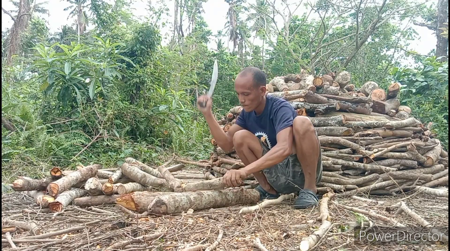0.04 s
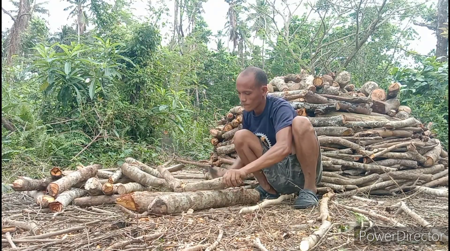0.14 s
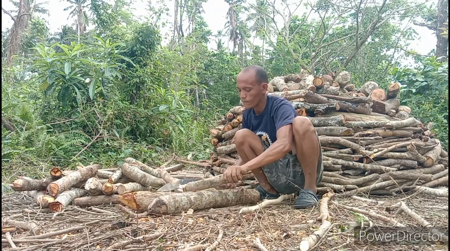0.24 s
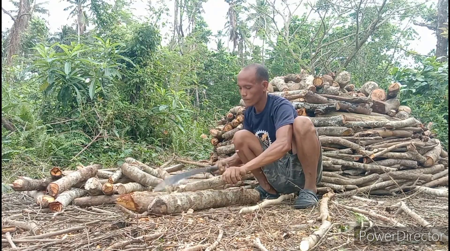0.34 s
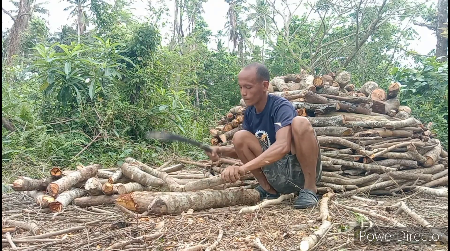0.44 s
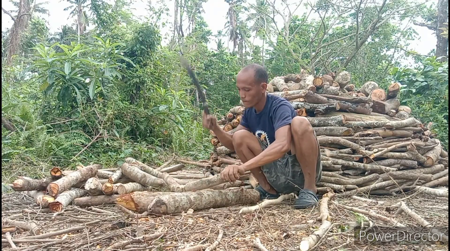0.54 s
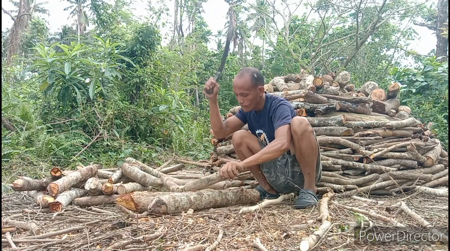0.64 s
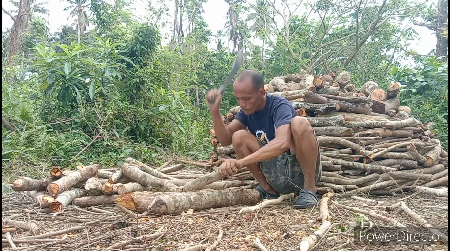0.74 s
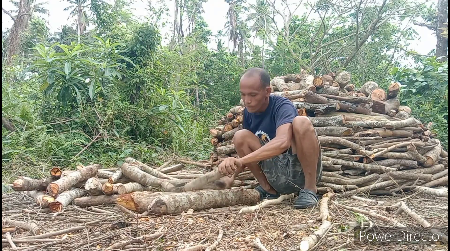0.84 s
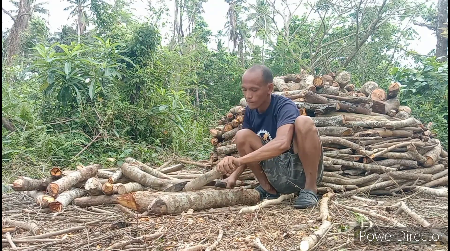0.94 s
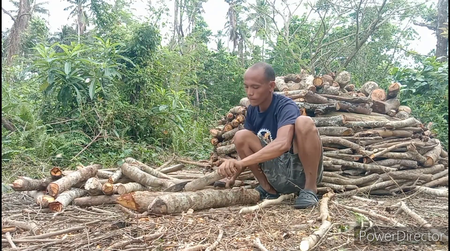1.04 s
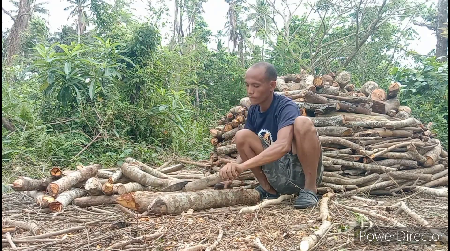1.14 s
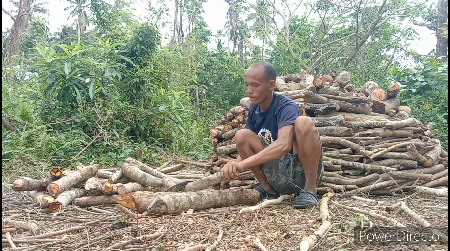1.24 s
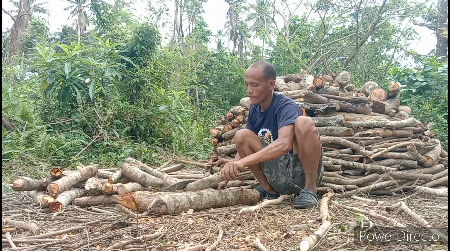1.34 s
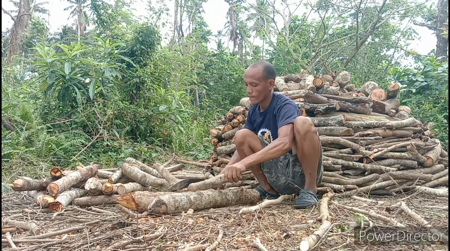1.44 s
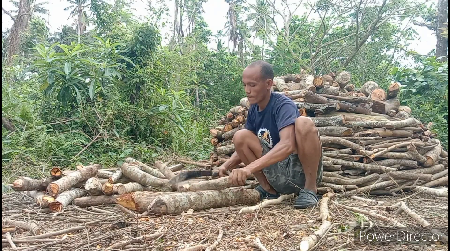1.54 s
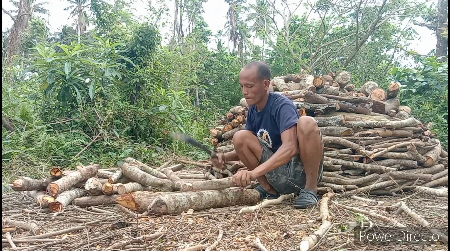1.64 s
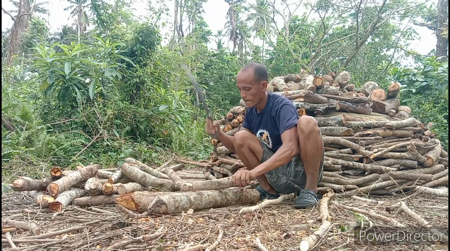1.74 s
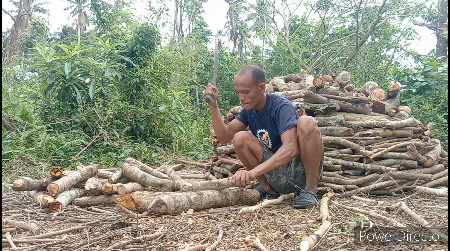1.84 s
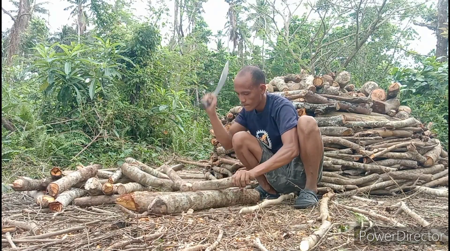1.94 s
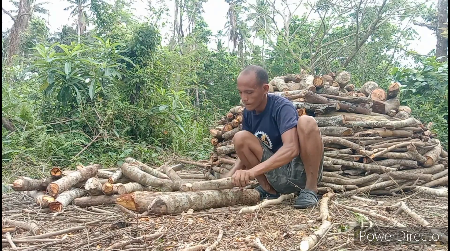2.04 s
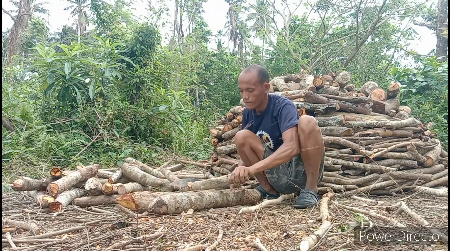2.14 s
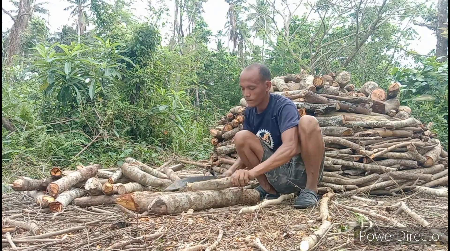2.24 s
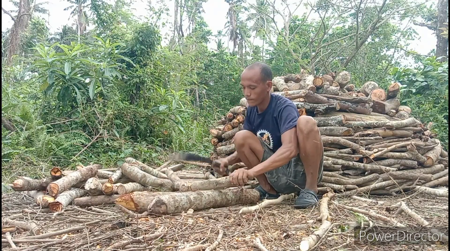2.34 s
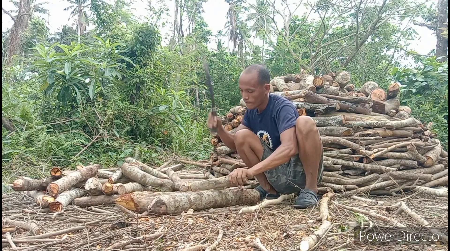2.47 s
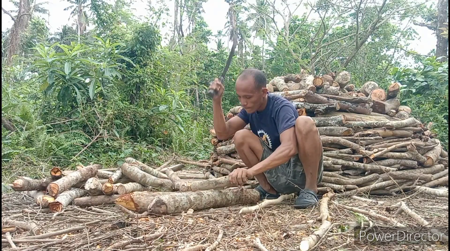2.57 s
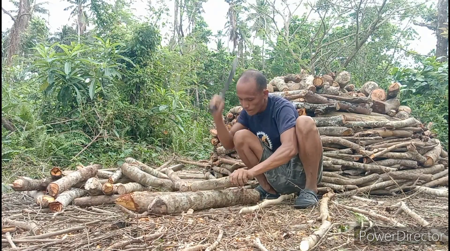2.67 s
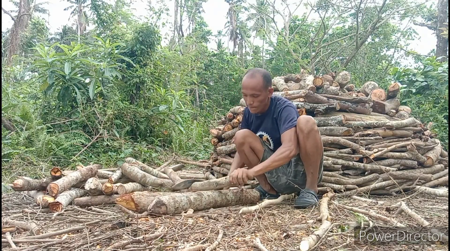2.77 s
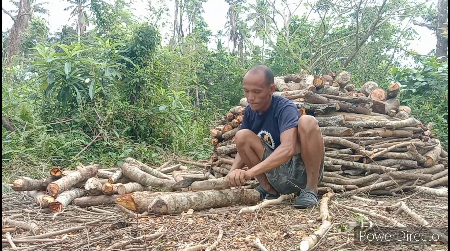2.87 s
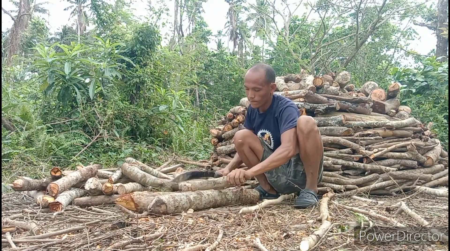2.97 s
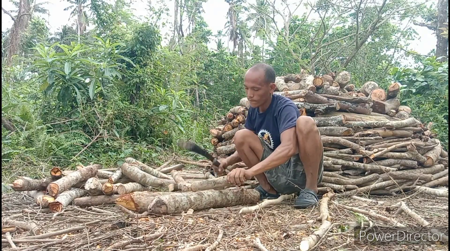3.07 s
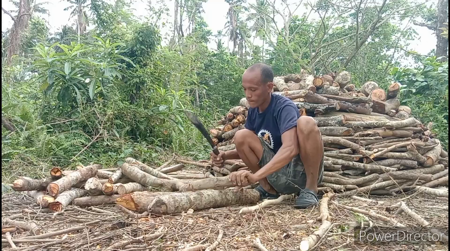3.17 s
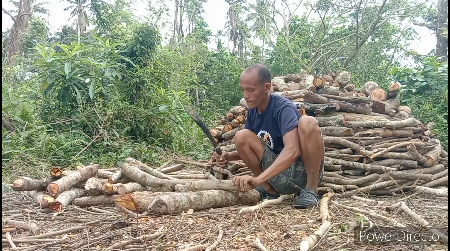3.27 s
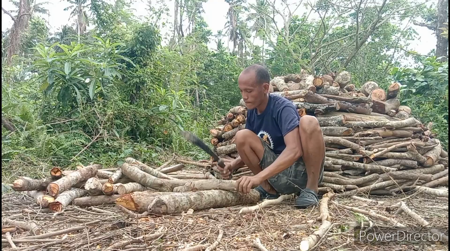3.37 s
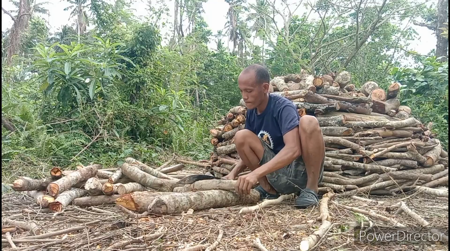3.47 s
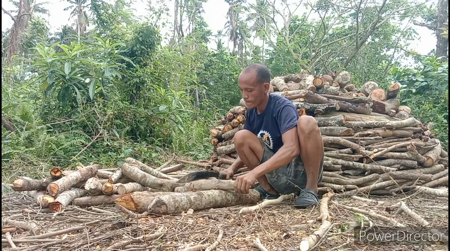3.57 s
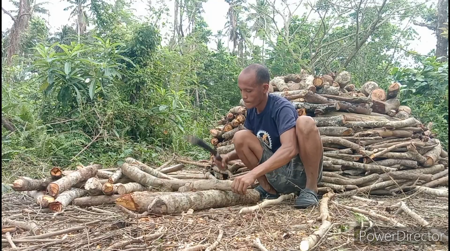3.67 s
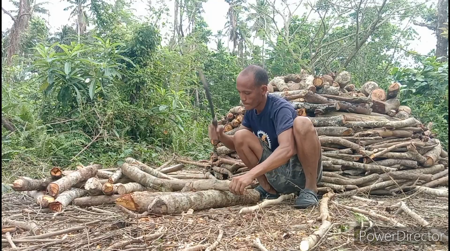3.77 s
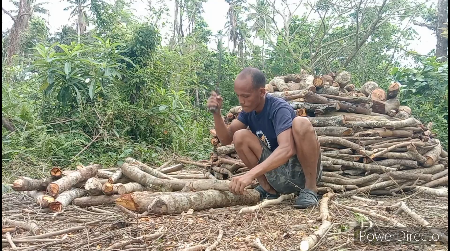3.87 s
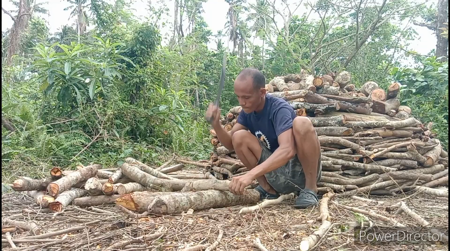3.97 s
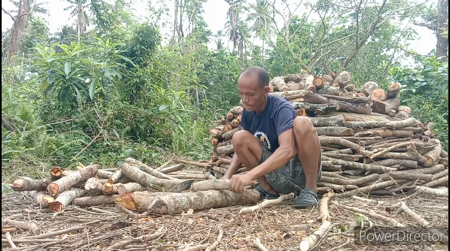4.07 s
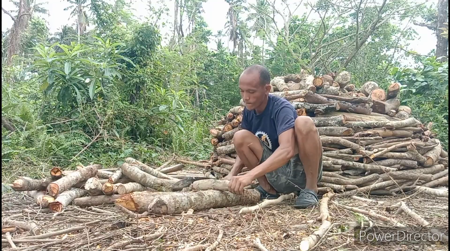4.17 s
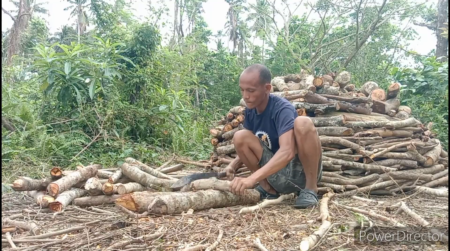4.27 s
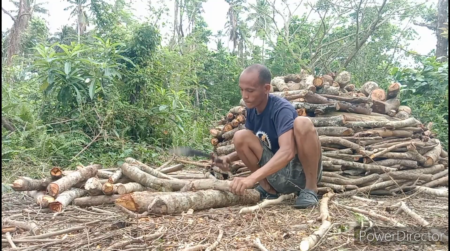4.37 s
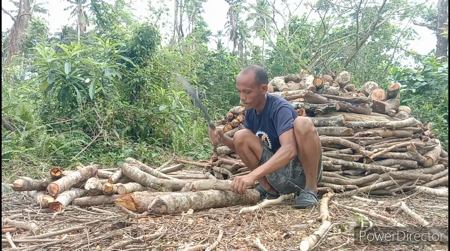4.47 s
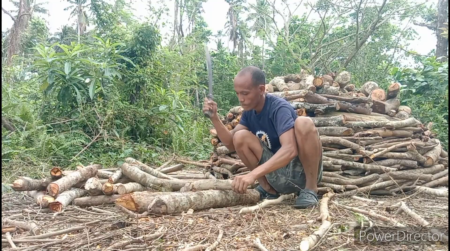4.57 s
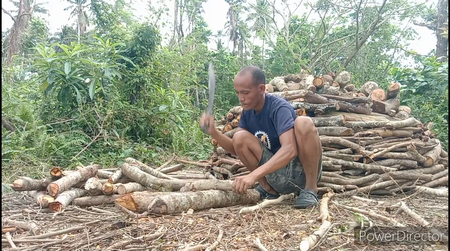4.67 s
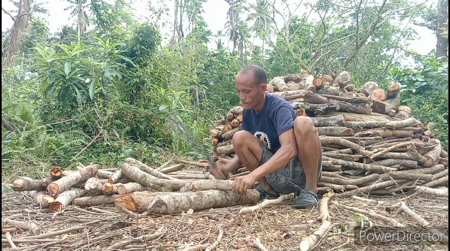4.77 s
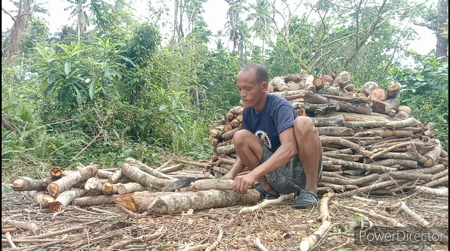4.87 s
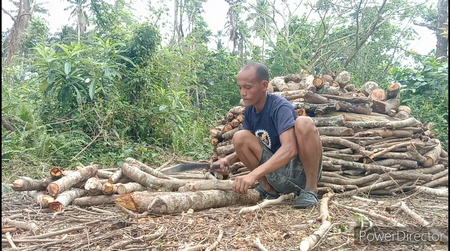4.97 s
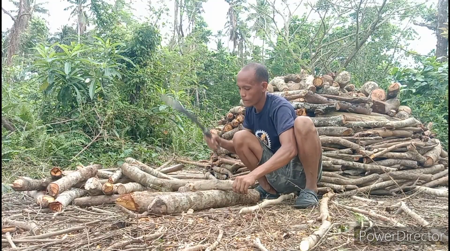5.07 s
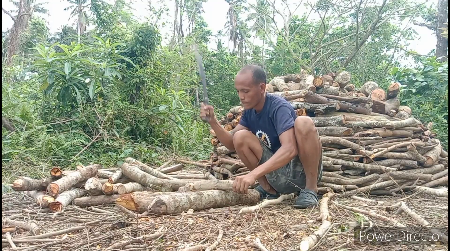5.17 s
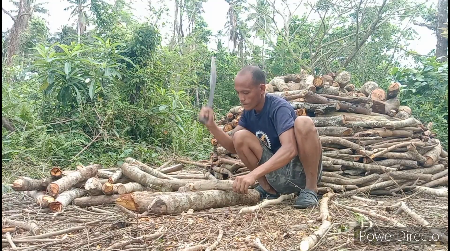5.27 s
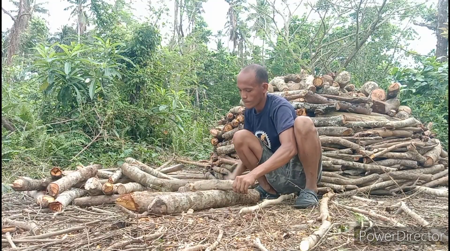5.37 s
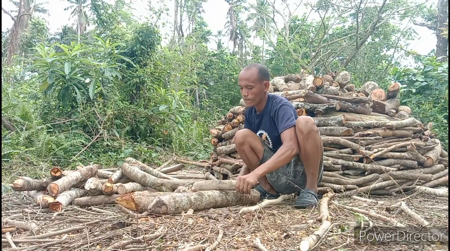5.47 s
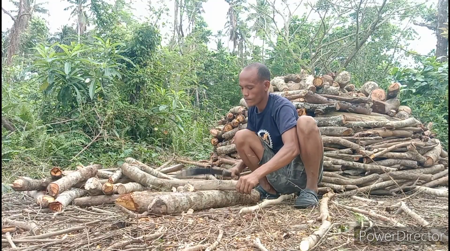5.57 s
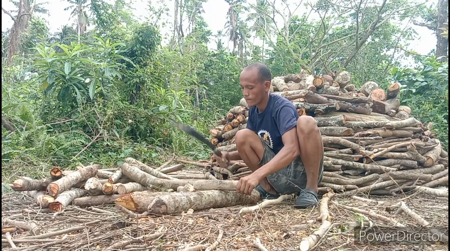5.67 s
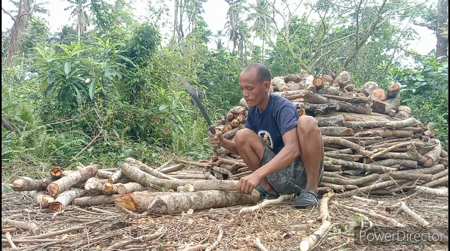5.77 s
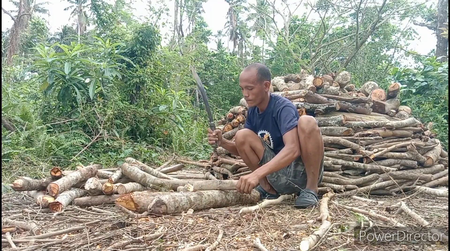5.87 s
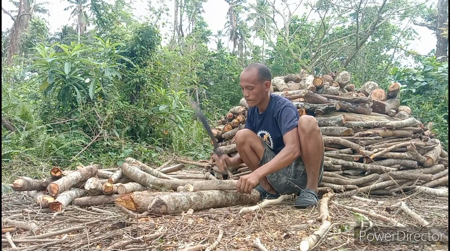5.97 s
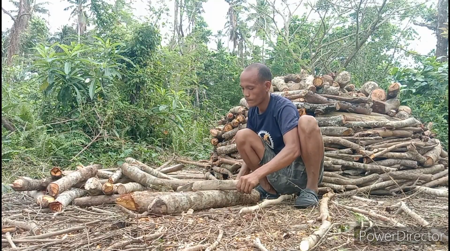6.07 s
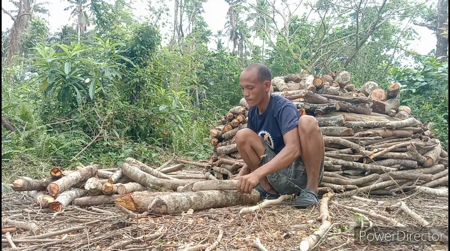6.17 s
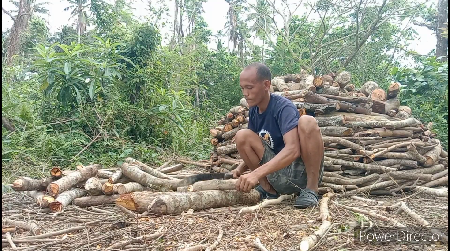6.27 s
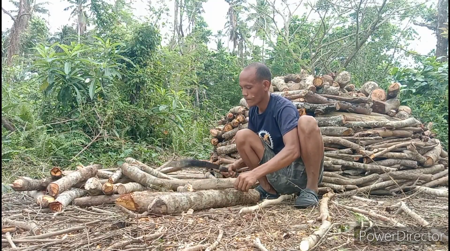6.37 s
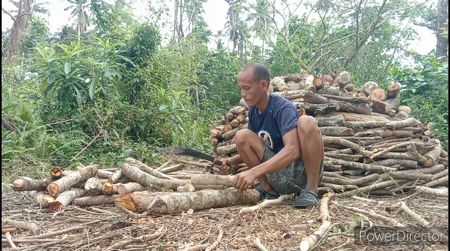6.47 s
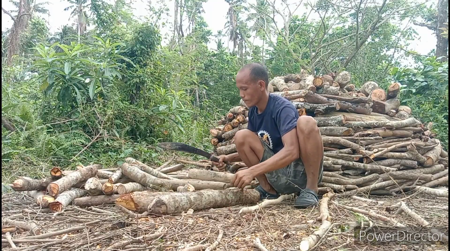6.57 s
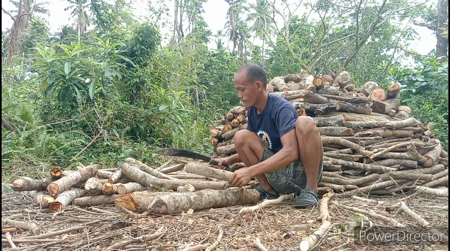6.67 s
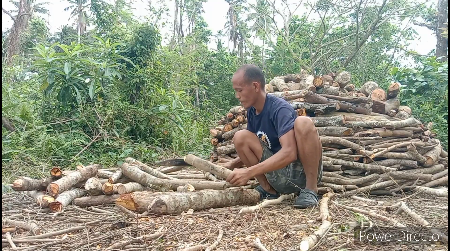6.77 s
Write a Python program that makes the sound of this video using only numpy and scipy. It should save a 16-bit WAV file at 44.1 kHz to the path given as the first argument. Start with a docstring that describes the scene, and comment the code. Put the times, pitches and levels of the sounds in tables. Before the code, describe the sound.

Outdoors in a wooded clearing, sharp chops of uneven force land on wood at a steady working pace, some cracking brightly, others knocking more hollowly. Small gritty rubs and soft bumps come between some blows as the branch shifts. Behind them lie a very quiet low air rumble, high pulsing cricket chirps, distant bird notes and a clearer falling whistle late on. The mono microphone is fairly near, with a short diffuse tree echo.

```python
"""Chopping a branch in a clearing

A machete chops a branch that lies across a log beside a woodpile.
Each blow is a noise burst of splitting fibres, decaying tones of branch and steel,
a low thud of the log, ticks of flying bark and a cloud of echoes from the trees.
Noise bands make the insects, crickets, hoarse calls and outdoor air.
Gliding, fluttering tones make the bird whistles."""
import sys
import numpy as np
from scipy import signal
from scipy.fft import rfft, irfft, next_fast_len
from scipy.io import wavfile
from scipy.ndimage import uniform_filter1d

SR = 44100
rng = np.random.default_rng(int(sys.argv[2]) if len(sys.argv) > 2 else 0)


def bounce(signal):
    """Save signal as a 16-bit WAV file at the path given by the first command-line argument."""
    frames = np.transpose(np.atleast_2d(signal))
    limited = np.clip(frames, -1, 1)
    pcm = np.round(limited * 32767).astype(np.int16)
    wavfile.write(sys.argv[1], SR, pcm)


N = 300762
TIME = np.arange(N) / SR
AGE = TIME[:SR // 2]  # seconds since a sound began, for sounds of up to half a second


def from_db(db):
    """Turn decibels into a gain."""
    return 10 ** (np.asarray(db) / 20)


def rms_one(x):
    """Scale a sound to an average strength (rms) of 1."""
    return x / np.sqrt(np.mean(x ** 2) + 1e-20)


def add(out, s, sound):
    """Mix a sound in at time s."""
    at = round(s * SR)
    out[at:at + len(sound)] += sound[:N - at]


def frequencies(size):
    """Frequencies in Hz of a spectrum, kept above zero so that logarithms work."""
    return np.maximum(np.fft.rfftfreq(size, 1 / SR), 1)


def noise(colour_db, size):
    """Noise of rms 1 whose spectrum follows a function of Hz."""
    spectrum = rfft(rng.standard_normal(size))
    return rms_one(irfft(spectrum * from_db(colour_db(frequencies(size))), size))


def long_noise(colour_db):
    """Coloured noise that lasts the whole scene."""
    return noise(colour_db, next_fast_len(N))[:N]


def at_hz(points, hz):
    """Read a table of (Hz, dB) between its points, on a log-frequency axis."""
    f, db = np.transpose(points)
    return np.interp(np.log(hz), np.log(f), db)


def bump(hz, centre, width):
    """Power response of a resonance: 1 on top, one half at the edges of its width."""
    return 1 / (1 + (2 * (hz - centre) / width) ** 2)


def band_db(centre_hz, width_hz):
    """Colour in dB of a noise band, about width_hz wide at half power."""
    return lambda hz: 30 * np.log10(bump(hz, centre_hz, 2 * width_hz))


def drift(rate, size):
    """Random wandering of spread 1 that heads for a new value rate times a second."""
    knots = rng.standard_normal(size // 8 + 2)
    return np.interp(np.arange(size) / SR * rate, np.arange(len(knots)), knots) * np.sqrt(3 / 2)


# outdoor background colour: (frequency [Hz], relative level [dB per Hz])
AIR_COLOUR = [(25, -21), (45, -2), (62, 10.5), (100, 1), (150, 3.5), (300, -5.5), (480, -11.5), (1040, -16),
              (1650, -15), (2900, -14), (4200, -21), (6400, -26.5), (9300, -30.5), (16000, -36)]


def air(level_db=-74.5):
    """Steady low outdoor rumble and a faint hiss of leaves, made from coloured noise."""
    return from_db(level_db) * long_noise(lambda hz: at_hz(AIR_COLOUR, hz))


# farther insect choruses:
# (centre [Hz], width [Hz], level [dB], mean throb rate [per s], throb depth [dB])
INSECT_CHORUSES = [(5380, 440, -79, 3.1, 2.5), (5574, 140, -73.5, 2.7, 2.5), (7120, 240, -88, 4, 2),
                   (7820, 770, -85, 4, 1), (10630, 700, -93, 5.7, 2.5), (1270, 170, -85.5, 0.69, 0.5)]


def insects(wander=0.14):
    """Many far buzzers blend into narrow noise bands that throb unevenly."""
    out = 0
    for centre_hz, width_hz, db, per_s, depth_db in INSECT_CHORUSES:
        throb_rate = per_s * (1 + wander * drift(1.8, N))
        throb = np.sin(2 * np.pi * np.cumsum(throb_rate) / SR)
        out = out + from_db(db + depth_db * throb) * long_noise(band_db(centre_hz, width_hz))
    return out


# hoarse far-off bird calls: (time [s], length [s], centre [Hz], peak level [dB])
HOARSE_CALLS = [(0.015, 0.11, 3330, -79), (1.81, 0.18, 3560, -74), (3.969, 0.09, 3200, -75.5)]


def rasps(width_hz=900):
    """Harsh calls, blurred by distance into soft swells of noise."""
    out = np.zeros(N)
    for s, length_s, centre_hz, db in HOARSE_CALLS:
        swell = np.sin(np.pi * np.minimum(AGE / length_s, 1))
        add(out, s, from_db(db) * swell * noise(band_db(centre_hz, width_hz), len(AGE)))
    return out


def whistle(points, waver=0.013, flutter_db=1.0, edge_s=.03):
    """A nearly pure, fluttering tone through points of (s, Hz, dB), with soft ends."""
    s, hz, db = np.transpose(points)
    t = np.arange(s[0], s[-1], 1 / SR)
    pitch_hz = np.interp(t, s, hz) * (1 + waver * drift(160, len(t)))
    level = from_db(np.interp(t, s, db) + flutter_db * drift(50, len(t)))
    edges = np.clip(np.minimum(t - s[0], s[-1] - t) / edge_s, 0, 1)
    tone = np.sin(2 * np.pi * np.cumsum(pitch_hz) / SR)
    return np.sqrt(2) * level * edges * tone


def glide(length_s, hz, octaves, db):
    """The two ends of a slide in pitch at a steady level."""
    return [(0, hz, db), (length_s, hz * 2 ** octaves, db)]


# Bird levels are those before the direct gain and the forest echo.
# level notes of far birds: (start [s], end [s], starting pitch [Hz], level [dB])
FAR_NOTES = [(.06, .17, 2130, -74), (1.202, 1.298, 2244, -76.5), (1.772, 1.897, 2123, -68),
             (2.122, 2.24, 1240, -74), (2.751, 2.94, 1265, -63.5), (3.78, 3.848, 1910, -72),
             (3.991, 4.059, 1265, -70.5), (4.814, 4.968, 1240, -75), (5.217, 5.32, 2680, -70.5),
             (6.408, 6.603, 3830, -78), (6.66, 6.82, 3990, -77)]
# a small bird's high falling chips: (time [s], level [dB])
BIRD_CHIPS = [(2.561, -70.5), (3.38, -73), (5.419, -70), (6.15, -72), (6.631, -55.5)]
# the nearest bird's song, a falling whistle that dwells halfway:
# (time into the song [s], pitch before the song's factor [Hz], level against the song's [dB])
SONG_SHAPE = [(0, 2170, -25), (.05, 2054, -25.5), (.11, 1825, -3.5), (0.169, 1810, 5.5), (.24, 1590, -9.5),
              (.33, 1266, 0), (.38, 1170, -12)]
# each time it sings: (time [s], pitch factor [ratio], level [dB])
SONG_TIMES = [(5.36, .995, -53), (6.52, 1.02, -47.5)]


def birds(direct_db=-1, forest_db=-8, forest_t60=0.63, note_octaves=0.014,
          chip_s=.06, chip_hz=7140, chip_octaves=-0.12, chip_waver=0.016,
          flick_s=.065, flick_hz=2150, flick_octaves=-0.5, flick_db=-23.5, flick_lead_s=.048):
    """Whistled songs, chips and far notes linger among the trees as a fading noise echo."""
    out = np.zeros(N)
    for s, end_s, hz, db in FAR_NOTES:
        add(out, s, whistle(glide(end_s - s, hz, note_octaves, db)))  # rises a little
    for s, db in BIRD_CHIPS:
        add(out, s, whistle(glide(chip_s, chip_hz, chip_octaves, db), chip_waver))
    for s, pitch, db in SONG_TIMES:
        # a quick downward flick leads into each song
        flick = glide(flick_s, flick_hz, flick_octaves, db + flick_db)
        add(out, s - flick_lead_s, whistle(flick))
        add(out, s, whistle(np.array(SONG_SHAPE) * [1, pitch, 1] + [0, 0, db]))
    echoes = rng.standard_normal(len(AGE)) * from_db(-60 * AGE / forest_t60)
    forest = signal.fftconvolve(out, echoes / np.linalg.norm(echoes))[:N]
    return from_db(direct_db) * out + from_db(forest_db) * forest


# the two crickets: (mean pitch mid-chirp [Hz], mean level [dB])
CRICKET_PAIR = [(5570, -70.5), (5840, -71)]
# bouts in which they chirp in step: (first chirp [s], end [s], rate [chirps per s])
CHIRP_BOUTS = [(0.064, 1.1, 6.4), (1.108, 4.35, 5.75), (4.505, 6.82, 6.16)]


def crickets(chirp_s=.027, rise_hz_per_s=1200, width_hz=90, spread_db=1.5,
             wing_hz=240, wing_depth=0.16, jitter_s=0.0073, stray_hz=25):
    """Each chirp is a short swell of wing strokes that rises in pitch, blurred by the bushes."""
    out = np.zeros(N)
    t = AGE - 3 * chirp_s  # zero at the top of the swell
    swell = np.exp(-(t / chirp_s) ** 2) * (1 + wing_depth * np.sin(2 * np.pi * wing_hz * t))
    rise = np.exp(1j * np.pi * rise_hz_per_s * t ** 2)
    bouts = [np.arange(first_s, end_s, 1 / per_s) for first_s, end_s, per_s in CHIRP_BOUTS]
    for s in np.concatenate(bouts):
        for pitch_hz, db in CRICKET_PAIR:
            late, louder, higher = rng.standard_normal(3)
            band = noise(band_db(pitch_hz + stray_hz * higher, width_hz), len(t))
            # the complex form of the band lets its pitch be shifted upward in time
            chirp = swell * np.real(signal.hilbert(band) * rise)
            start_s = np.clip(s + t[0] + jitter_s * late, 0, TIME[-1])
            add(out, start_s, from_db(db + spread_db * louder) * chirp)
    return out


# colour of splitting fibres: (frequency [Hz], relative level [dB per Hz])
FIBRE_COLOUR = [(600, -19), (1300, -5.5), (2000, -15.5), (2700, -1.5), (3600, -3), (4500, -4.5),
                (5100, -5.5), (6700, -6.5), (8100, -17.5), (9700, -11.5), (12000, -27.5), (15500, -19)]


def crack(bite_s, colour, rise_s=0.00013, splinter_db=-21, splinter_t60=0.08, grain_db=1.0, snap_db=5.0):
    """Fibres part in a dense burst while the edge sinks in; a few more snap unevenly afterwards."""
    size = len(AGE)
    cut = np.exp(-(AGE / bite_s) ** 2 / 2) * from_db(grain_db * drift(1500, size))
    snaps = from_db(splinter_db - 60 * AGE / splinter_t60 + snap_db * drift(700, size))
    force = (cut + snaps) * (1 - np.exp(-AGE / rise_s))
    fibres = rng.standard_normal(size)
    # the wood sets the broad colour; only the fine peaks and notches are left to chance
    broad = np.sqrt(uniform_filter1d(np.abs(rfft(force * fibres)) ** 2, size=400))
    hz = frequencies(size)
    wood = from_db(at_hz(FIBRE_COLOUR, hz) + colour(hz))
    return force * rms_one(irfft(rfft(fibres) / broad * wood, size))


# steel blade: (pitch [Hz], starting level against the crack [dB], time to fall 60 dB [s])
BLADE_MODES = [(1553, -28, 0.038), (1832, -35, 0.17), (2690, -28, 0.058), (2790, -30, .2),
               (4500, -35, 0.14), (7240, -31.5, 0.14), (9630, -41, 0.15)]


def blade():
    """The steel rings briefly as decaying tones, damped by the cut that holds it."""
    out = 0
    for hz, db, t60 in BLADE_MODES:
        out = out + from_db(db - 60 * AGE / t60) * np.sin(2 * np.pi * hz * AGE)
    return out


def bark_chips(count=14, mean_flight_s=.055, chip_db=-21, spread_db=4, centre_hz=3600, octaves=.7,
               fade_cycles=9 * np.pi):
    """Bits of bark fly off the cut and tick on the dry litter, the later ones more softly."""
    out = np.zeros(N)
    t = AGE[:SR // 20]
    lateness = rng.gamma(3, 1 / 3, count)  # 1 on average
    chances = np.clip(rng.standard_normal((2, count)), -2, 2)
    for late, louder, higher in zip(lateness, *chances):
        hz = min(centre_hz * 2 ** (octaves * higher), SR / 3)
        # falls by 60 dB in fade_cycles swings
        tick = np.sin(2 * np.pi * hz * t) * from_db(-60 * t * hz / fade_cycles)
        level = from_db(chip_db + spread_db * louder) * np.exp(-late)
        add(out, late * mean_flight_s, level * tick)
    return out[:len(AGE)]


# litter and soil shaken by the log: (frequency [Hz], relative level [dB per Hz])
LITTER_COLOUR = [(30, -19.5), (60, -1), (115, 0.5), (180, -3.5), (260, -14.5), (350, -12), (480, -21),
                 (900, -52), (16000, -89)]
# the log on the ground: (pitch [Hz], damping width [Hz], swell's peak against the thud's level [dB])
LOG_MODES = [(163, 150, 3), (134, 27, -15), (206, 45, -12.5), (84.5, 46, -19)]


def thud(lag_s=0.0017, litter_db=-18, litter_t60=0.37, litter_rise_s=0.0042):
    """The log is pressed into the ground: its low tones swell and die, and the litter rumbles on."""
    t = np.maximum(AGE - lag_s, 0)
    shake = (1 - np.exp(-t / litter_rise_s)) * from_db(litter_db - 60 * t / litter_t60)
    out = shake * noise(lambda hz: at_hz(LITTER_COLOUR, hz), len(AGE))
    for hz, width_hz, db in LOG_MODES:
        u = np.pi * width_hz * t
        swell = (u / 2) ** 2 * np.exp(2 - u)  # peaks at 1
        out = out - from_db(db) * swell * np.sin(2 * np.pi * hz * t)
    return out


# branch modes in four families (low ring, high ring, clack, knock), before build-up and late fade:
# (mean pitch [Hz], level against the family's [dB], time to fall 60 dB [s])
BRANCH_MODES = [
    [(495.4, -1, .3), (543, -12, 0.55)],
    [(612.1, 4, .15), (522, -17.5, 0.24)],
    [(348, -6.5, 0.037), (463, 1.5, .018), (637, -5.5, 0.036), (849, 1, 0.018), (1000, -1.5, .025),
     (1550, -3, 0.035), (1795, -13, 0.021)],
    [(1100, -7, 0.076), (1242, 2, 0.045), (1352, -3, 0.031), (1252, -22.5, .25)],
]


def branch(family_db, contact_s=0.0013, detune=.004, late_fade_s=.15):
    """Modes build up while the contact lasts; the ring fades faster and faster toward its end."""
    out = 0
    for modes, level_db in zip(BRANCH_MODES, family_db):
        for k, (hz, db, t60) in enumerate(modes):
            swing = np.sin(2 * np.pi * hz * (1 + detune * rng.normal()) * AGE)
            sign = (-1) ** k  # neighbouring modes start in opposite directions
            out = out + sign * from_db(level_db + db - 60 * AGE / t60) * swing
    build_up = 1 - np.exp(-AGE / contact_s)
    late_fade = np.exp(-(AGE / late_fade_s) ** 4)
    return out * build_up * late_fade


def rings(db, place):
    """The place of contact shares the ring between the low and high bending modes; dB of each."""
    angle = np.pi / 2 * np.clip(place, .001, .999)
    return db + 20 * np.log10([np.cos(angle), np.sin(angle)])


# colour that the surroundings give to a crack: (frequency [Hz], relative level [dB])
ECHO_COLOUR = [(50, 12.5), (120, 23.5), (250, 12.5), (600, 9), (900, 5), (1250, 9.5), (2000, 10.5),
               (2800, 1), (3600, -0.5), (4400, 3), (5400, 2), (7000, 5.5), (12000, 6), (15500, 6)]


def scatter(blow, rise_s=0.02, fade_s=0.082, shape=1.7, patchy_db=1.5):
    """Woodpile, trunks and leaves return the crack, peaks and notches too, as a lumpy echo cloud."""
    level = (1 - np.exp(-AGE / rise_s)) * np.exp(-(AGE / fade_s) ** shape)
    level = level * from_db(patchy_db * drift(350, len(AGE)))
    echoes = noise(lambda hz: at_hz(ECHO_COLOUR, hz), len(AGE))
    # multiplying the spectra smears the blow through the echoes
    return level * rms_one(irfft(rfft(blow) * rfft(echoes), len(AGE)))


# blows on the branch: (time [s], crack level [dB], bite [s], crack pitch [Hz], its peak [dB],
# brightness [dB per octave], thud level [dB], clack level [dB], knock level [dB], ring level [dB],
# place [0-1 from the low ring's spot to the high ring's])
CHOP_BLOWS = [(0.3211, -8, 0.003, 2753, 9.5, 0, -23.5, -19.5, -24, -34, 0.87),
              (1.016, -15, 0.0029, 3600, 1, -0.5, -23, -19.5, -17, -25.5, 0.71),
              (2.2368, -13, 0.0038, 3014, 5.5, 0, -28.5, -21, -12.5, -27, 0.08),
              (2.9332, -10, 0.0025, 2902, 7, -3.5, -20.5, -9, -16, -15, 0),
              (3.6378, -40.5, 0.0021, 3820, 11.5, 4.5, -47.5, -38.5, -35.5, -52.5, 0.48),
              (4.2526, -14, .0021, 3910, 4, 2, -21.5, -29, -29.5, -23, 0.11),
              (4.959, -18.5, 0.004, 3720, 3.5, 2.5, -22, -23, -24.5, -30, 0),
              (5.5481, -13, 0.0026, 3270, -2, -1.5, -20, -14, -11, -34.5, 0.85),
              (6.2311, -20.5, 0.0031, 3223, 6.5, -3, -35.5, -23, -19, -23, .87)]


def chops(peak_width_hz=600, scatter_db=-24, usual_bite_s=.003, scatter_db_per_doubling=10.5):
    """Each blow has its own balance of modes and its own crack colour."""
    out = np.zeros(N)
    for (s, crack_db, bite_s, crack_hz, peak_db, bright, thud_db,
         clack_db, knock_db, ring_db, place) in CHOP_BLOWS:

        def colour(hz):
            """A peak at the crack's pitch plus a tilt that levels off an octave below it."""
            tilt = bright * np.log2(np.maximum(hz / crack_hz, 1 / 2))
            return peak_db * bump(hz, crack_hz, peak_width_hz) + tilt

        split = crack(bite_s, colour)
        # the echoes follow the crack's level, and a longer, deeper bite feeds them more
        depth_db = scatter_db_per_doubling * np.log2(bite_s / usual_bite_s)
        echo_db = crack_db + scatter_db + depth_db
        add(out, s, from_db(crack_db) * (split + blade() + bark_chips()))
        add(out, s, from_db(thud_db) * thud())
        add(out, s, branch([*rings(ring_db, place), clack_db, knock_db]))
        add(out, s, from_db(echo_db) * scatter(split))
    return out


# short gritty rubs, a sharp snap of splitting wood and a faint narrow knock:
# (time [s], mean level at the start [dB], fade time [s], pitch [Hz], band width scale [octaves])
RUBS_AND_SNAP = [(0.611, -67.5, 0.019, 1680, 0.88), (.805, -54, 0.0046, 2430, .8),
                 (0.817, -54, .0076, 2600, 1.5), (1.392, -51.5, 0.0053, 1880, 0.41),
                 (1.406, -66.5, 0.041, 2034, 0.24), (1.596, -64.5, 0.014, 4010, 1.3),
                 (2.9486, -21.5, 0.0013, 3600, 2.21), (3.303, -59.5, 0.0081, 775, 0.12),
                 (3.636, -48, 0.0058, 2550, 0.052)]


def rubs_and_snap(grain_db=2.0, echo_db=-24, echo_t60=0.12):
    """Gritty rubs, a snap of splitting wood and a narrow knock: short noise bands, faintly echoed."""
    out = np.zeros(N)
    for s, db, fade_s, pitch_hz, octaves in RUBS_AND_SNAP:
        force = np.exp(-AGE / fade_s) + from_db(echo_db - 60 * AGE / echo_t60)
        grit = noise(lambda hz: 20 * np.log10(bump(np.log2(hz / pitch_hz), 0, 2 * octaves)), len(AGE))
        grain = grain_db * drift(600 * octaves, len(AGE))
        add(out, s, from_db(db + grain) * force * grit)
    return out


# the hand shifts the branch and it bumps softly on the log:
# (time [s], knock level [dB], ring level [dB])
BRANCH_NUDGES = [(.821, -51, -78), (1.394, -51, -79), (3.447, -59, -47.5), (3.503, -58, -68.5)]


def nudges(place=0.082, soft_s=0.0024, clack_db=-14, damp_s=0.076):
    """A soft contact with the log sounds the branch modes faintly, damped by the hand."""
    out = np.zeros(N)
    damping = np.exp(-AGE / damp_s)
    for s, knock_db, ring_db in BRANCH_NUDGES:
        family_db = [*rings(ring_db, place), knock_db + clack_db, knock_db]
        add(out, s, branch(family_db, soft_s) * damping)
    return out


def scene():
    """All the sounds, added into one channel."""
    background = air() + insects() + rasps() + birds() + crickets()
    return (background + chops() + rubs_and_snap() + nudges())[None]


def record(dry, low_cut_hz=58, top_cut_hz=15700):
    """The microphone loses the deep bass, the highest peaks are rounded and the top is cut."""
    bass_cut = signal.butter(2, low_cut_hz, "high", fs=SR, output="sos")
    top_cut = signal.ellip(10, .1, 80, top_cut_hz, fs=SR, output="sos")
    rounded = np.tanh(signal.sosfilt(bass_cut, dry))
    return signal.sosfilt(top_cut, rounded)


dry = scene()
out = record(dry)
bounce(out)
```